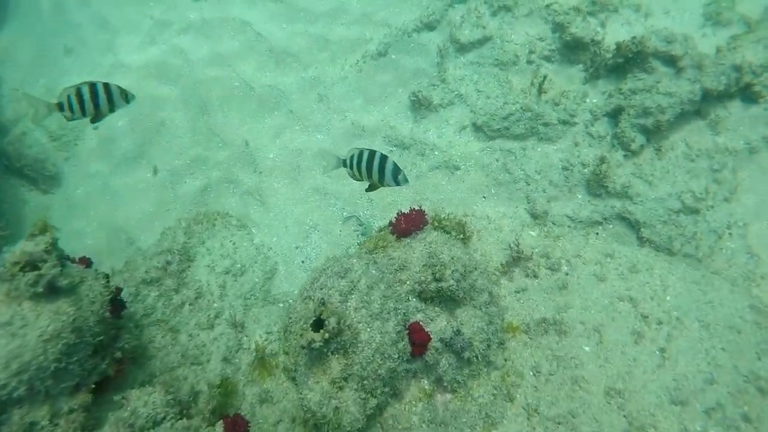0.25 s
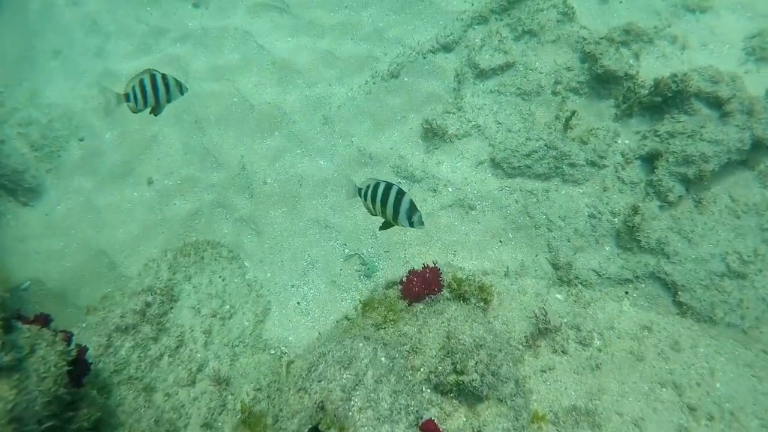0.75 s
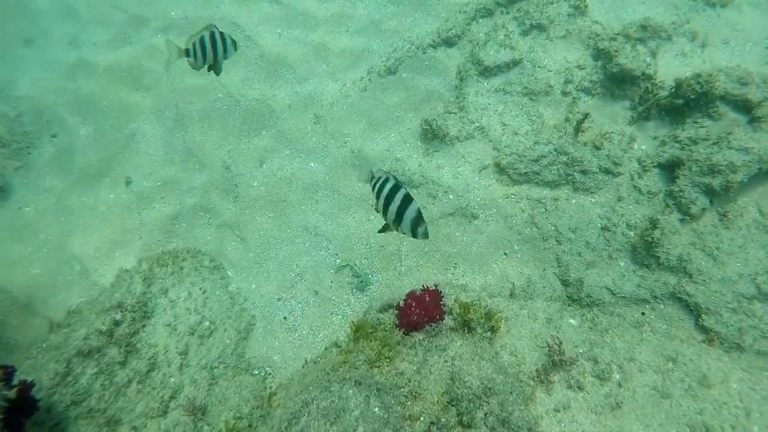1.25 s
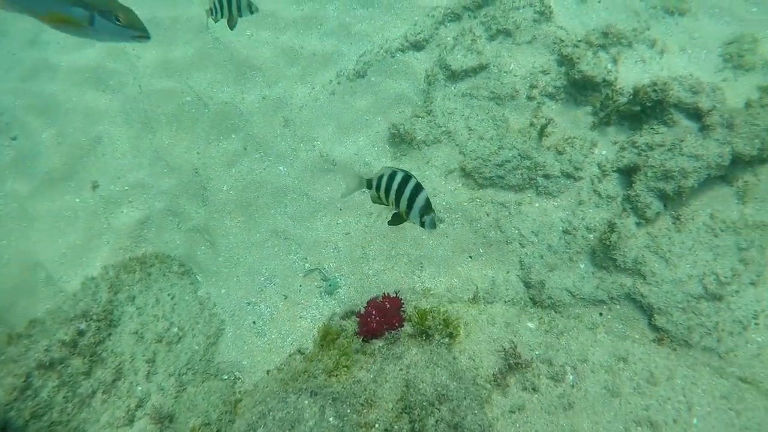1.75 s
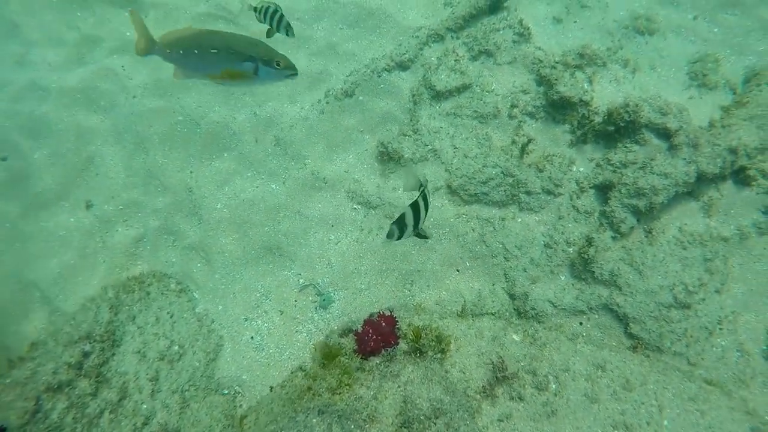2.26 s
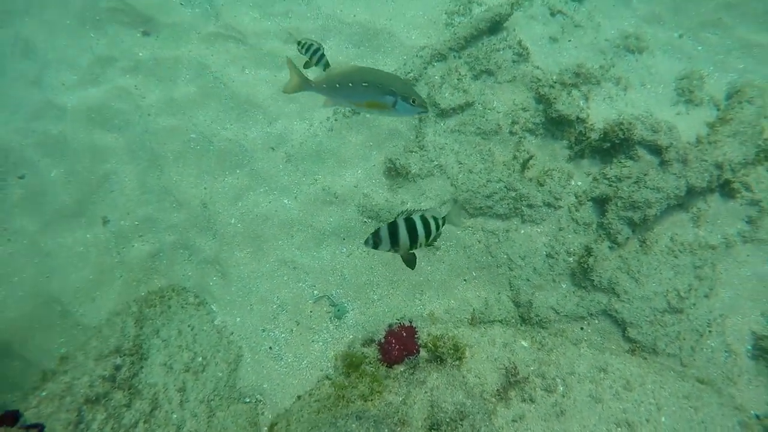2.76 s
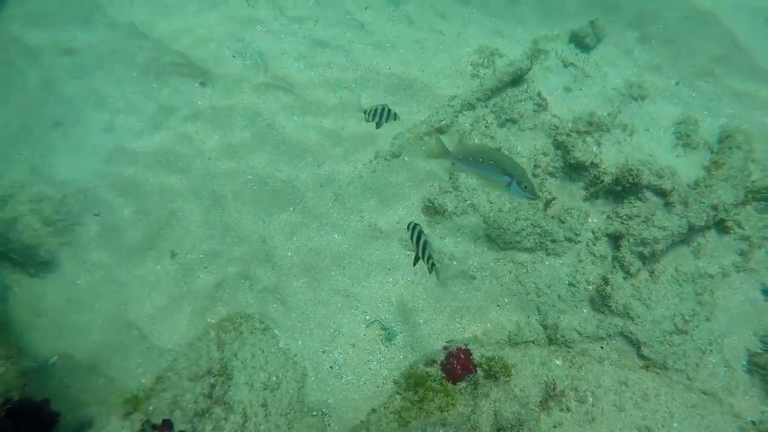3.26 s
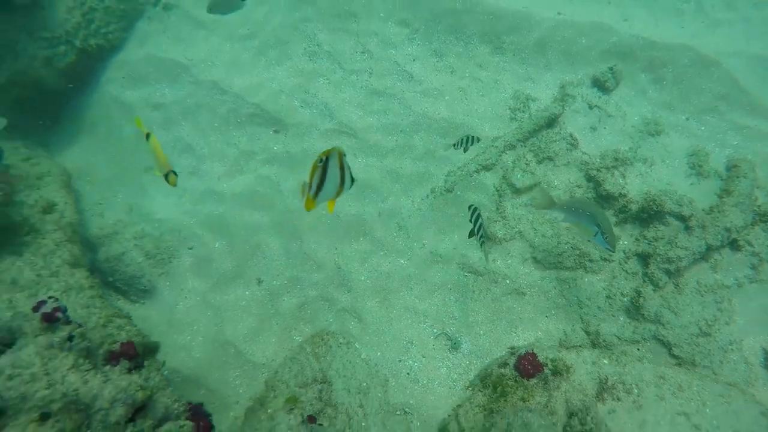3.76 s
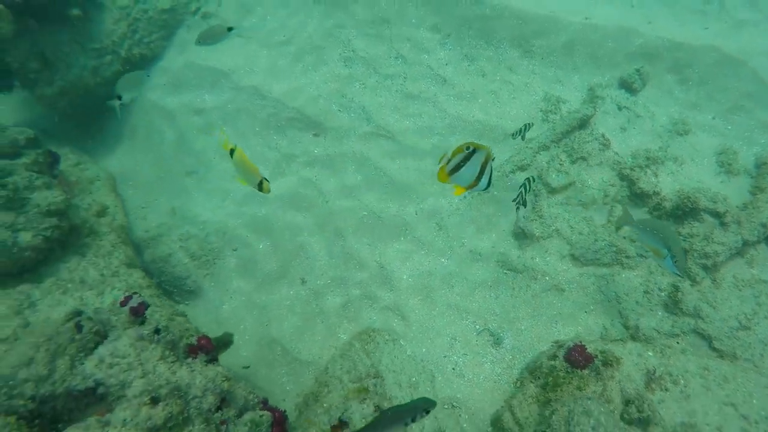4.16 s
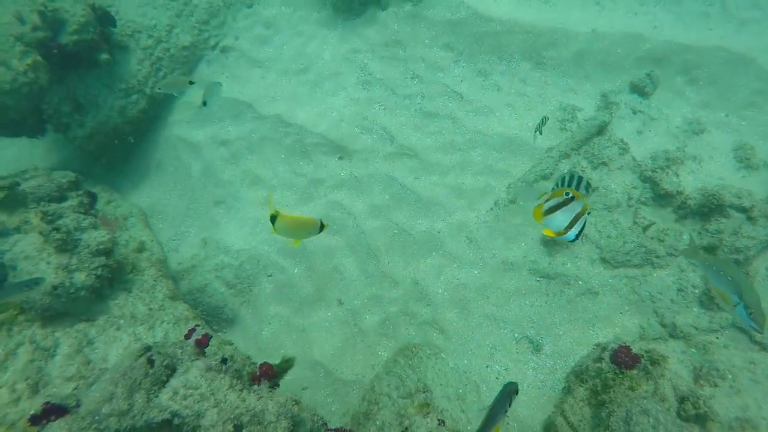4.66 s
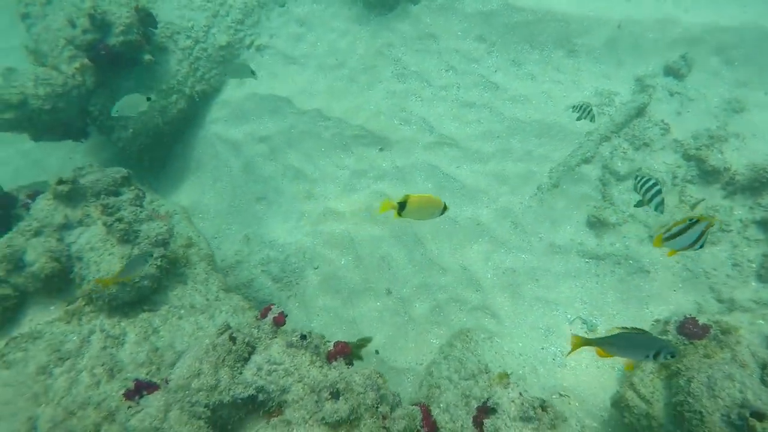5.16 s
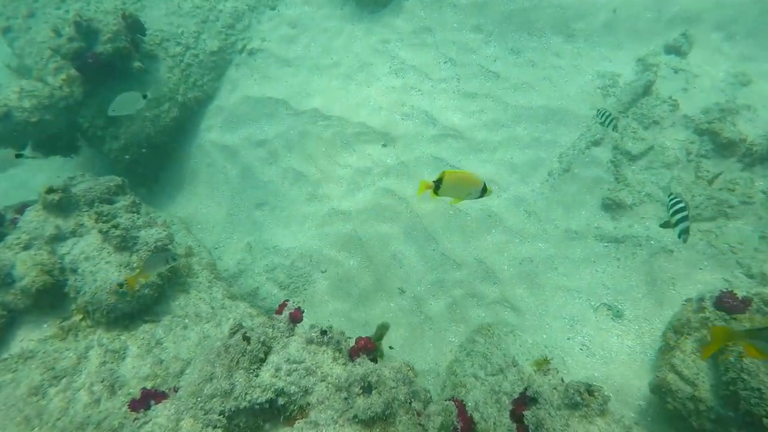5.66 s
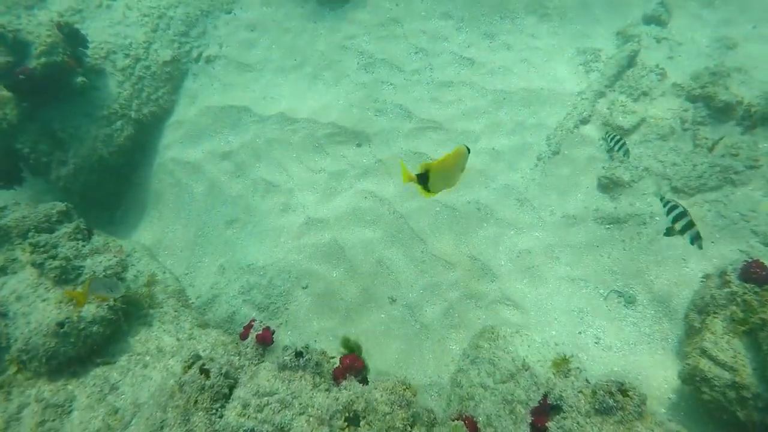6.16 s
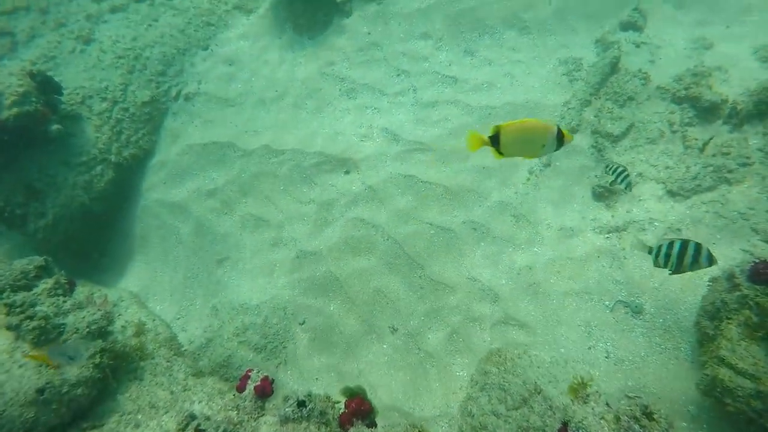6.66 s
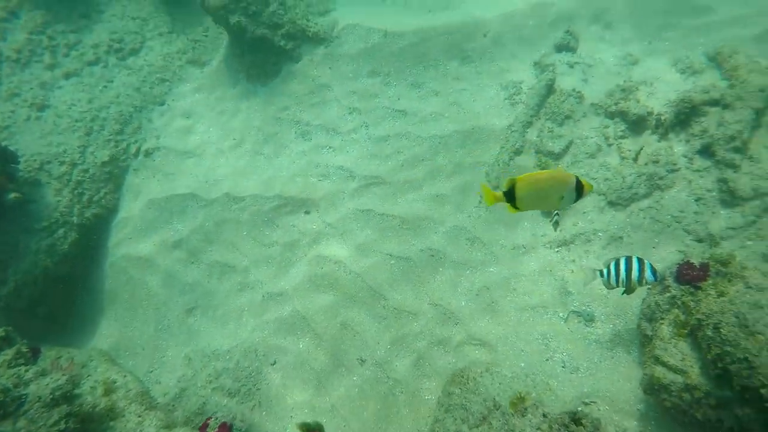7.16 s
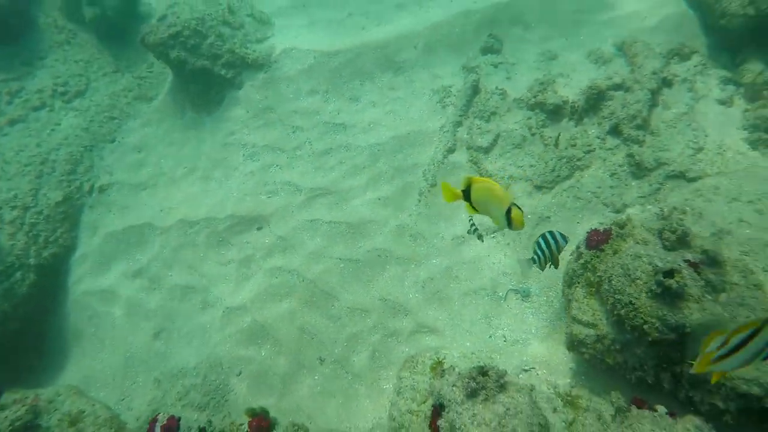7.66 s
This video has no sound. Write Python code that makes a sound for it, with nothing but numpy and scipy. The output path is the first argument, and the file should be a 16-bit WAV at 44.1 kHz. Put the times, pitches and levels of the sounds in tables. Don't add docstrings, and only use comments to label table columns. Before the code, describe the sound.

Underwater, sharp little clicks and dull, hollow taps patter constantly around a cased camera while a deep swell rumbles beneath.

```python
import sys
import numpy as np
from scipy import signal
from scipy.fft import rfft, irfft, next_fast_len
from scipy.io import wavfile
from scipy.ndimage import uniform_filter1d

SR = 44100
rng = np.random.default_rng(int(sys.argv[2]) if len(sys.argv) > 2 else 0)


def gain_from_db(level_db):
    decades = np.asarray(level_db, float) / 20
    return 10 ** decades


def wav_out(sig):
    wavfile.write(sys.argv[1], SR, np.round(np.clip(np.atleast_2d(sig).T, -1, 1) * 32767).astype(np.int16))


N = 349272
GRAIN = 2048

# t/s, level/dB, quick sway over slow sway/dB
SWELL = [(0.0, -27.5, -4), (0.17, -26.5, -3), (0.86, -35, -4.5), (1.19, -26, -2), (1.23, -37, -0.5),
         (1.52, -32.5, 2.5), (2.2, -34.5, -1), (2.38, -27.5, -2.5), (3.62, -32.5, -3), (4.06, -23, -11),
         (4.81, -36, 2), (4.94, -28, 10), (5.12, -31.5, 2.5), (6.53, -32, 2.5), (6.6, -44, 4),
         (6.66, -31, 22), (6.9, -30, -1.5), (7.92, -28, -9)]
# f/Hz, width/Hz
SWAYS = [(29, 13.9), (45, 13.8)]
# t/s, crackle level/dB, stirring level/dB
COLONY = [
    (0.0, -51, -42.5),
    (0.13, -49, -51),
    (1.1, -52.5, -50),
    (3.79, -51.5, -49.5),
    (4.72, -52.5, -53),
    (5.18, -48.5, -43.5),
    (5.67, -52.5, -52.5),
    (7.68, -49.5, -49),
    (7.92, -51.5, -51),
]
# f/Hz, level/dB per Hz
FAR_SPECTRUM = [(35, -34), (60, -13.5), (107, -17.5), (402, -24), (654, -23.5), (1250, -48.5), (1540, -31),
                (1690, -46), (1900, -27), (2880, -34.5), (3240, -29), (5150, -49), (8980, -53),
                (15300, -60.5)]
# f/Hz, width/Hz, level/dB
WALL = [(1488, 78, -6), (1897, 32.3, 2), (2300, 413, -1), (2797, 590, -3), (3200, 520, 0.5),
        (3674, 1150, -7.5)]
# f/Hz, level/dB per Hz
CRACK_SPECTRUM = [(2650, -18.5), (4500, 3.5), (5110, -9), (5550, -2), (8670, -3), (10200, -7.5),
                  (14400, -5.5), (15300, -9.5)]

# t/s, peak level/dB, f/Hz, decay/cycles
PLINKS = [(0.326, -48, 920, 2), (0.689, -35, 946, 3.1), (1.129, -38.5, 895, 3.3), (1.174, -45, 1010, 2.5),
          (1.141, -35, 452, 2.8), (3.086, -35.5, 624, 9.5), (4.444, -40, 917, 6.5),
          (5.091, -37.5, 940, 4.1), (5.31, -39, 1110, 3.5), (6.166, -32.5, 837, 2.5),
          (7.22, -33.5, 872, 4.1)]
# t/s, peak level/dB, f/Hz
THUMPS = [(0.039, -27.5, 246), (0.223, -28.5, 300), (0.266, -32, 364), (0.319, -22, 246), (1.086, -26, 320),
          (1.327, -27, 173), (1.539, -27, 246), (1.773, -26, 328), (1.802, -25.5, 304), (2.521, -26.5, 425),
          (2.757, -24, 323), (3.004, -28.5, 183.3), (3.613, -29.5, 234), (3.734, -30.5, 296),
          (3.809, -25, 298), (3.965, -24.5, 396), (4.062, -28.5, 320.5), (4.442, -21.5, 270),
          (5.013, -24, 390), (5.09, -27, 268.6), (5.211, -27, 290), (5.239, -29, 300), (5.278, -27.5, 382),
          (5.456, -21, 303.3), (6.174, -24.5, 393), (7.051, -25.5, 240), (7.129, -26, 398),
          (7.268, -20.5, 300), (7.69, -24, 416), (7.768, -25.5, 177)]
SOFT_THUMPS = [(0.427, -34.5, 260), (0.593, -35, 248), (0.63, -32.5, 255), (0.881, -31, 150),
               (1.141, -49, 428), (1.925, -36, 318), (1.988, -31, 172), (2.628, -33, 308),
               (2.981, -37, 161), (3.134, -40.5, 151), (3.268, -33, 312), (3.832, -35, 167),
               (3.918, -31.5, 228), (4.631, -30, 340), (5.123, -28, 222), (5.559, -34, 383),
               (5.959, -35.5, 154.5), (6.066, -34, 331), (6.108, -29.5, 240.6), (6.231, -34, 433),
               (6.498, -34.5, 182), (6.665, -30.5, 270), (6.703, -34, 181), (6.833, -32.5, 162),
               (6.958, -36, 263), (7.151, -36, 240), (7.414, -31, 423), (7.487, -39, 301),
               (7.534, -29, 224), (7.636, -33, 187)]
FAINT_THUMPS = [(0.539, -42, 151), (1.055, -35, 160), (1.174, -33, 155), (1.483, -39, 231),
                (2.074, -34.5, 191), (2.473, -33.5, 154), (2.577, -38, 151), (2.687, -37, 395.5),
                (3.722, -29, 300), (3.849, -39, 183), (4.998, -27, 383), (5.148, -36, 184),
                (6.199, -39, 188), (6.345, -29, 460), (6.612, -33.5, 237), (6.996, -39, 280),
                (7.03, -29, 263), (7.441, -36, 450)]
# t/s, peak level/dB
KNOCKS = [(0.04, -27), (0.224, -31.5), (0.323, -24.5), (1.057, -26), (1.261, -25.5), (1.806, -28),
          (1.927, -22.5), (2.075, -26), (2.152, -17.5), (2.472, -23), (2.797, -24.5), (3.322, -13.5),
          (3.553, -29), (3.776, -25.5), (4.101, -14), (4.444, -22), (4.908, -16.5), (5.091, -24.5),
          (5.123, -24), (5.252, -22.5), (5.563, -26.5), (5.662, -15), (6.066, -24), (6.096, -19),
          (6.345, -13.5), (6.613, -27), (6.96, -26.5), (7.131, -28), (7.503, -23.5), (7.767, -27)]
LIGHT_KNOCKS = [(0.147, -34.5), (0.376, -32), (0.53, -32.5), (0.561, -36), (1.379, -33), (1.525, -33),
                (2.541, -32), (2.56, -32), (3.418, -39), (3.488, -35.5), (3.723, -41), (3.919, -33.5),
                (4.24, -38), (4.348, -38.5), (4.521, -34), (5.003, -34), (5.06, -37), (5.633, -30),
                (5.845, -38), (5.975, -35), (6.165, -32), (6.731, -34), (6.76, -35.5), (7.028, -35),
                (7.187, -33.5), (7.36, -35.5), (7.666, -31.5), (7.715, -42), (7.746, -31), (7.892, -59)]
FAINT_KNOCKS = [(0.3918, -38), (0.4356, -35.5), (0.6453, -35), (1.4907, -35), (1.5117, -38.6), (1.54, -33),
                (1.7754, -33), (2.2127, -35.7), (2.2787, -38.0), (2.5811, -36), (2.6178, -39.4),
                (2.6454, -40), (2.6873, -41), (2.8913, -31.5), (3.0876, -39), (3.1398, -33.5),
                (3.1764, -36.5), (3.2618, -32.6), (3.2899, -37), (3.7955, -38), (3.8104, -34),
                (3.8325, -35.8), (3.9886, -40), (4.1238, -37), (4.1541, -30.2), (4.5678, -36.5),
                (4.6309, -28.5), (4.6912, -38.5), (5.0131, -46), (5.0433, -37), (5.126, -27.5),
                (5.1573, -34), (5.1705, -35), (5.2349, -27), (5.3386, -39), (5.3897, -37), (5.9635, -35.5),
                (6.0406, -35), (6.1759, -42), (6.2357, -38.9), (6.6684, -30.5), (6.8355, -37),
                (7.2324, -31.5), (7.3385, -36), (7.3718, -34), (7.4181, -33.7), (7.4432, -41),
                (7.5382, -31), (7.6366, -29.5), (7.7774, -40)]
# t/s, peak level/dB, strongest f/Hz
CRACKS = [(0.0412, -46.5, 5500), (0.2259, -43, 5520), (0.8803, -42.5, 8340), (1.0909, -40, 6790),
          (1.1267, -43, 6720), (1.185, -42.5, 8420), (1.791, -39, 8450), (1.8066, -35, 6300),
          (2.076, -40.5, 5450), (2.107, -42, 7070), (2.2655, -36.5, 8540), (2.548, -44, 8800),
          (3.0016, -40.5, 6060), (3.523, -41, 7140), (3.8108, -31.5, 8550), (4.0642, -40, 6050),
          (4.446, -40.5, 7260), (4.631, -43, 5920), (5.1123, -41, 5943), (5.1272, -35.5, 5400),
          (5.2118, -40, 6960), (5.4583, -30.5, 8600), (5.7747, -38.5, 8580), (6.346, -43, 8930),
          (6.9685, -39.5, 6150), (7.0506, -38.5, 7100), (7.07, -37, 5440), (7.2205, -43, 6800),
          (7.2675, -36, 8650), (7.6916, -41, 6190)]
TICKS = [(0.0058, -46, 8100), (0.0198, -50, 7240), (0.052, -47.8, 5020), (0.1542, -43, 5580),
         (0.6852, -48.5, 5020), (0.6935, -47.5, 8270), (0.7442, -45, 6070), (0.8582, -43.2, 7240),
         (1.0219, -47, 8310), (1.0817, -45, 6760), (1.3767, -44.5, 5950), (1.6105, -46.5, 5100),
         (1.7999, -47.7, 8550), (1.842, -46, 7860), (2.1257, -50, 7060), (2.4221, -48, 5920),
         (2.8594, -42.7, 8200), (2.9375, -49, 8830), (3.5812, -52, 6500), (3.6261, -52, 5340),
         (3.6583, -48, 6160), (3.7382, -41.2, 5470), (3.7854, -46.1, 6070), (3.8564, -50, 6140),
         (3.9679, -52, 5790), (3.992, -52, 6930), (4.1019, -47, 6460), (4.2441, -52, 6350),
         (4.2618, -45.9, 5940), (4.2957, -51, 6910), (4.3088, -44, 5270), (4.4533, -44.5, 6420),
         (4.5675, -49, 7490), (4.6916, -45.5, 6700), (4.734, -47.6, 6220), (4.7802, -60, 5020),
         (4.7884, -44, 6140), (4.8449, -41, 6820), (4.9607, -45, 6520), (5.0032, -44, 5530),
         (5.3376, -45, 6780), (5.6628, -42.5, 8900), (6.0533, -49, 6660), (6.1688, -47, 6090),
         (6.2056, -42.8, 7030), (6.2665, -50, 5710), (6.347, -33.9, 6890), (6.4032, -42, 6200),
         (6.4368, -46, 5960), (6.5525, -46, 8940), (6.6706, -43, 7130), (6.6893, -42, 6980),
         (6.7612, -47, 6480), (6.8391, -51, 6310), (7.0616, -49, 6830), (7.0878, -47, 5360),
         (7.4671, -50, 9110), (7.4783, -43.5, 7000), (7.7223, -51, 7000), (7.792, -43, 6200)]
# t/s, peak level/dB, strongest f/Hz
SNAPS = [(0.2254, -27, 2370), (0.2535, -28.5, 3120), (0.324, -28.5, 2400), (0.6893, -26.5, 1750),
         (1.0562, -27.5, 1986), (1.0885, -29, 2410), (1.808, -28, 2370), (1.9898, -28.5, 1970),
         (2.1523, -19.5, 2030), (3.0032, -26, 1950), (3.3209, -25.5, 2320), (3.9555, -28, 1830),
         (4.0621, -25.5, 2360), (4.4463, -25, 1910), (4.9065, -25, 2440), (4.9605, -31.5, 1990),
         (5.0913, -24.5, 1870), (5.1228, -28.5, 2250), (5.2497, -25, 1910), (5.3133, -30, 1874),
         (5.4585, -25.5, 2470), (5.661, -25, 2436), (5.7543, -28.5, 2020), (6.095, -23, 2260),
         (6.345, -24, 2462), (6.4028, -31.5, 1990), (6.7051, -26.5, 3840), (7.1303, -25.5, 2100),
         (7.5025, -21.5, 2045), (7.8106, -27.5, 3120)]
NEXT_SNAPS = [(0.3496, -30.5, 3340), (0.3812, -32.5, 3360), (0.859, -33, 3330), (1.181, -30.5, 3200),
              (1.4307, -30, 2980), (1.7753, -33.5, 2010), (2.0746, -33.5, 2480), (2.1165, -32, 3430),
              (2.2646, -34.5, 3300), (2.519, -36, 2250), (2.5485, -30, 2090), (2.6898, -30.5, 3400),
              (2.8912, -31, 2330), (3.5217, -33.5, 3300), (3.576, -32, 1860), (3.8017, -31.5, 2300),
              (3.8188, -32, 3060), (4.1002, -30, 2500), (4.3058, -34, 1910), (4.6292, -30.5, 2370),
              (5.0116, -32.5, 1860), (5.2844, -30, 1860), (5.5618, -32.5, 2640), (5.7768, -32, 1874),
              (6.176, -29.5, 1850), (6.9607, -28.5, 1920), (6.988, -33, 2250), (7.221, -32, 1970),
              (7.2679, -33.5, 3280), (7.637, -29.5, 1930)]
FAINT_SNAPS = [(0.0065, -38.5, 1980), (0.0197, -40, 1780), (0.0517, -38, 1920), (0.2795, -39, 3560),
               (0.5297, -37.5, 1960), (0.6494, -34, 1850), (0.756, -41, 3360), (0.9646, -39, 2350),
               (1.0207, -36.5, 1870), (1.171, -37, 2380), (1.5127, -37.8, 1920), (1.6527, -35.5, 1885),
               (1.8, -35, 2390), (1.8414, -41, 2370), (2.009, -41, 2300), (2.025, -37, 3320),
               (2.2127, -38.5, 1935), (2.5093, -34.5, 2300), (2.5414, -31.0, 2450), (2.6174, -37, 2370),
               (2.649, -39, 3170), (2.7467, -38, 3170), (2.9367, -41, 3200), (2.983, -43, 3190),
               (3.0703, -39.1, 2460), (3.0815, -34.8, 2700), (3.3872, -40.5, 1915), (3.5233, -34, 3680),
               (3.6156, -33, 1890), (3.626, -36, 1820), (3.6584, -38, 1840), (3.81, -33, 2240),
               (3.965, -35, 1800), (3.9924, -33.5, 3250), (4.019, -40, 3530), (4.0294, -40, 1880),
               (4.2435, -34, 1920), (4.6905, -38.5, 1920), (4.7342, -39, 1890), (4.916, -39, 3270),
               (5, -29.5, 1850), (5.0613, -38, 2330), (5.1579, -36.9, 1870), (5.2348, -32, 1870),
               (5.8457, -38, 1820), (6.166, -32.5, 1890), (6.483, -39.6, 2260), (6.7604, -39, 1962),
               (6.7736, -40.5, 1920), (6.838, -35.5, 1880), (7.015, -38.5, 3080), (7.0882, -41, 1890),
               (7.2315, -37, 1920), (7.3395, -37.6, 1930), (7.6544, -40, 3120), (7.666, -35, 2240),
               (7.6906, -32.5, 1970), (7.7215, -32.5, 1920), (7.842, -40.5, 1870), (7.893, -38.5, 3170)]
# t/s, peak level/dB
FAR_SNAPS = [(0.1207, -35), (0.643, -40), (0.6567, -35.5), (0.7437, -34), (1.4577, -35), (1.5384, -34),
             (1.609, -36), (1.7449, -33), (1.909, -32.5), (2.04, -32.5), (2.757, -30), (2.859, -32),
             (2.9462, -34.5), (3.234, -36.5), (3.26, -33), (3.548, -32), (3.61, -42), (3.7374, -36),
             (3.7774, -35), (3.905, -31.5), (4.151, -36), (4.2602, -35.5), (4.843, -34.5), (5.1795, -32),
             (5.434, -30.5), (5.645, -35.5), (6.0438, -38), (6.3228, -33.5), (6.6892, -35), (7.4778, -34)]


def unit(x):
    return x / np.sqrt(np.mean(x ** 2))


def curve(table, column=1):
    rows = np.array(table)
    return np.interp(np.arange(N) / SR, rows[:, 0], rows[:, column])


def resonate(x, hz, width):
    return signal.lfilter(*signal.iirpeak(hz, hz / width, fs=SR), x)


def colour(x, table):
    hz, db = np.transpose(table)
    bins_hz = np.arange(2049) * SR / 4096
    log_gain = np.interp(np.log(bins_hz + 1), np.log(hz), db) * np.log(10) / 20
    cepstrum = irfft(log_gain)
    cepstrum[1:2048] *= 2
    cepstrum[2049:] = 0
    response = irfft(np.exp(rfft(cepstrum)))
    return signal.fftconvolve(x, np.atleast_2d(response), axes=-1)[:, :x.shape[-1]]


def wall(x, least_width=0):
    out = 0
    for k, (hz, width, db) in enumerate(WALL):
        out = out + (-1) ** k * gain_from_db(db) * resonate(x, hz, max(width, least_width))
    return out


def place(grains, s, db):
    out = np.zeros(N + GRAIN)
    for grain, start, gain in zip(grains, (np.asarray(s) * SR).astype(int), gain_from_db(db)):
        out[start:start + GRAIN] += grain * gain / np.abs(grain).max()
    return out[:N]


def bursts(decay_ms, rise_ms, tail_db, tail_ms):
    ms = np.arange(GRAIN) / SR * 1000
    front = np.exp(-(ms / decay_ms[:, None]) ** 0.96)
    tail = gain_from_db(tail_db) * np.exp(-ms / tail_ms)
    rise = 1 - np.exp(-ms / rise_ms)
    return rng.standard_normal((len(decay_ms), GRAIN)) * (front + tail) * rise


def pulsations(hz, rise, fall, glide, drop=1):
    cycles = hz[:, None] * np.arange(GRAIN) / SR
    shape = (1 - np.exp(-cycles / rise)) ** 2 * np.exp(-(cycles / fall) ** drop)
    return shape * np.sin(2 * np.pi * (cycles + glide * cycles ** 2))


def favour(grains, hz, width, db):
    return np.array([g + gain_from_db(db) * resonate(g, f, width * f) for g, f in zip(grains, hz)])


def dull(grains, db):
    top_db = db * rng.standard_normal((len(grains), 1)) - db
    return grains + (gain_from_db(top_db) - 1) * resonate(grains, 13800, 5600)


def lengths(events, ms, spread):
    return ms * np.exp(spread * rng.standard_normal(len(events)))


def apart(rows, others, gap_s=0.008):
    rows = np.array(rows)
    gaps = np.abs(rows[:, :1] - np.array(others)[:, 0])
    return rows[gaps.min(axis=1) > gap_s]


def times_and_levels(*tables):
    return np.vstack([np.array(table)[:, :2] for table in tables])


def strays(db, spread_db, count, low_hz, high_hz):
    when, strength, pitch = rng.random((count, 3)).T
    s = (np.arange(count) + when) / count * (N - 1) / SR
    crackle_db = curve(COLONY)
    busy_db = crackle_db[(s * SR).astype(int)] - np.mean(crackle_db)
    level_db = db + busy_db + spread_db * (2 * strength - 1)
    return np.transpose([s, level_db, low_hz * (high_hz / low_hz) ** pitch])


def smear(power, ms):
    return signal.lfilter([1], [1, -np.exp(-1000 / (ms * SR))], power)


def specks(per_second, spread_db, smear_ms):
    present = rng.random(N) < per_second / SR
    size = present * gain_from_db(np.minimum(spread_db * rng.exponential(size=N), 9))
    power = uniform_filter1d(smear(size ** 2, smear_ms), size=40)
    return unit(np.sqrt(np.abs(power)))


def scatter(smear_ms):
    s, db = times_and_levels(SNAPS, NEXT_SNAPS, FAR_SNAPS, FAINT_SNAPS).T
    power = np.bincount((s * SR).astype(int), gain_from_db(1.14 * db), N)
    return unit(np.sqrt(smear(power, smear_ms) + 1e-12))


def scrape(s, db):
    rough = bursts(lengths(s, ms=5.2, spread=0.16), rise_ms=0.89, tail_db=16.5, tail_ms=6.1)
    rough = resonate(rough, 470, 530)
    return place(resonate(rough, 530, 680), s, db)


def hum():
    return unit(resonate(rng.standard_normal(N), 117, 14)) * gain_from_db(-67)


def swell():
    out = 0
    for (hz, width), side in zip(SWAYS, (-0.5, 0.5)):
        sway = resonate(resonate(rng.standard_normal(N), hz, width), hz, width)
        sway = signal.hilbert(unit(sway), next_fast_len(N))[:N]
        evened = sway.real / (np.abs(sway) + 0.87) ** 0.39
        evened = resonate(resonate(evened, hz, 2.1 * width), hz, 2.1 * width)
        rocking_db = curve(SWELL) - 3.5 + side * curve(SWELL, column=2)
        out = out + unit(evened) * gain_from_db(rocking_db)
    return out


def colony():
    far = colour(rng.standard_normal((1, N)), FAR_SPECTRUM)[0]
    walled = wall(far)
    far = (far + 0.058 * walled + 0.5 * resonate(far, 694, 84)) / np.std(walled)
    spectrum = rfft(far)
    freq = np.arange(N // 2 + 1) * SR / N
    shared = specks(110, spread_db=2.0, smear_ms=3.2)
    shared = unit(0.79 * shared + 0.68 * scatter(smear_ms=6))
    crackle_db, stirring_db = curve(COLONY), curve(COLONY, column=2)
    out = 0
    for hz in 62.5 * np.sqrt(2) ** np.arange(17):
        share = np.cos(np.pi / 2 * np.clip(2 * np.log2((freq + 1) / hz), -1, 1)) ** 2
        band = irfft(spectrum * share * (freq < 15200), N)
        own = specks(min(hz / 9, 70), spread_db=2.5, smear_ms=0.83 + 1500 / hz)
        grain = 1.53 * shared + 1.12 * own
        if hz < 130:
            level = gain_from_db(-60)
        elif hz < 1200:
            level = unit(grain + 0.053) * gain_from_db(stirring_db - 7)
        elif hz < 4500:
            level = unit(grain + 0.34) * gain_from_db(crackle_db - 8.5)
        else:
            ticks = 0.5 * shared + 0.9 * own + 1.3 * np.sqrt(hz / 4500)
            level = unit(ticks) * gain_from_db(0.5 * (crackle_db + 60) - 62.5)
        out = out + band * level
    return out


def plinks():
    s, db, hz, cycles = np.transpose(PLINKS)
    ring = pulsations(hz, rise=0.74, fall=cycles[:, None], glide=-0.0011)
    return place(ring, s - 0.001, db + 0.5)


def thumps():
    lone_knocks = apart(KNOCKS, THUMPS + SOFT_THUMPS + FAINT_THUMPS)
    undertones = [(s, db - 10.5, 488) for s, db in lone_knocks]
    chance = strays(-39, 6.8, count=16, low_hz=165, high_hz=438)
    s, db, hz = np.vstack([THUMPS, SOFT_THUMPS, FAINT_THUMPS, undertones, chance]).T
    pulse = pulsations(hz, rise=0.36, fall=0.82, glide=0.0062)
    return place(pulse, s - 0.0008, db + 1.5) + scrape(s, db - 10)


def knocks():
    taps = apart(times_and_levels(SNAPS, NEXT_SNAPS, FAR_SNAPS), KNOCKS + FAINT_KNOCKS) + [0, -11]
    faint = apart(FAINT_KNOCKS, KNOCKS + LIGHT_KNOCKS)
    s, db = np.vstack([KNOCKS, LIGHT_KNOCKS, faint, taps]).T
    hz = 656 - 1.85 * (db + 35.5) + 26 * rng.standard_normal(len(s)) * (db < -21)
    ring = pulsations(hz, rise=0.78, fall=3.22, glide=-0.00098, drop=1.7)
    after = pulsations(1.1 * hz, rise=1.1, fall=5.3, glide=0)
    return place(ring + gain_from_db(-13) * after, s - 0.0004, db + 0.32) + scrape(s, db - 23.5)


def cracks():
    s, db, hz = np.vstack([CRACKS, apart(TICKS, CRACKS, gap_s=0.003)]).T
    burst = bursts(lengths(s, ms=1.4, spread=0.26), rise_ms=0.22, tail_db=-11.5, tail_ms=6.1)
    burst = dull(colour(burst, CRACK_SPECTRUM), db=4.5)
    return place(favour(burst, hz, width=0.12, db=6), s - 0.0003, db + 2)


def rattles():
    blows = [(CRACKS, 4.5), (KNOCKS + LIGHT_KNOCKS, -16), (SOFT_THUMPS, -6)]
    rows = np.vstack([times_and_levels(table) + [0, db] for table, db in blows])
    for snapped in (SNAPS, NEXT_SNAPS, FAR_SNAPS, FAINT_SNAPS):
        rows = apart(rows, snapped)
    rows = np.vstack([FAR_SNAPS, rows])
    return np.column_stack([rows, rng.choice(np.array(WALL)[2:, 0], len(rows))])


def snaps():
    near = np.vstack([SNAPS, NEXT_SNAPS])
    faint = apart(FAINT_SNAPS, near, gap_s=0.003)
    late_snap = [(4.4535, -29, 3520)]
    s, db, hz = np.vstack([near, late_snap, rattles(), faint]).T
    decay_ms = lengths(s, ms=4.2, spread=0.3) * gain_from_db(-0.12 * (db + 31))
    burst = bursts(decay_ms, rise_ms=0.23, tail_db=-26.5, tail_ms=8.1)

    treble = dull(colour(burst, CRACK_SPECTRUM), db=3)
    treble = favour(treble, rng.uniform(5600, 10600, len(s)), width=0.46, db=11)
    leak = place(treble, s, db - 18.5 + 3 * rng.standard_normal(len(s)))

    blow = favour(burst, hz, width=0.1, db=9.5)
    blow = favour(blow, rng.uniform(2260, 3700, len(s)), width=0.074, db=5.5)
    body = wall(blow, least_width=105) + gain_from_db(-18) * resonate(burst, 1380, 560)
    return place(body, s - 0.0004, db) + leak


def scene():
    background = hum() + swell() + colony()
    return (background + plinks() + thumps() + knocks() + cracks() + snaps())[None]


def band_limit(x):
    return signal.sosfilt(signal.butter(12, 15780, fs=SR, output="sos"), x)


def record(dry):
    top = signal.butter(16, 15150, fs=SR, output="sos")
    return band_limit(signal.sosfilt(top, dry))


dry = scene()
out = record(dry)
wav_out(out)
```